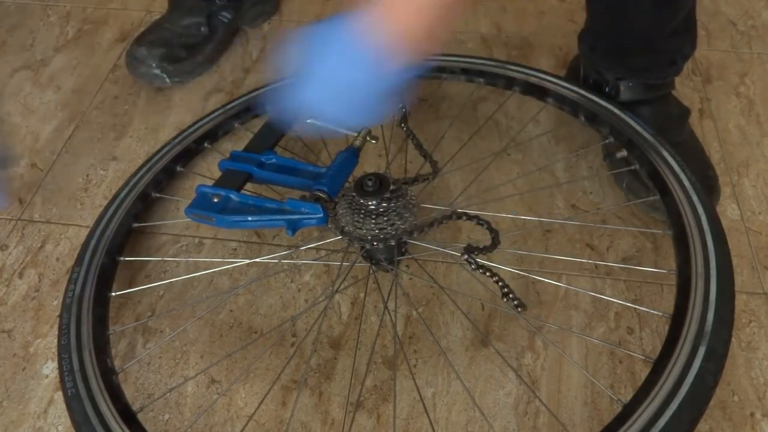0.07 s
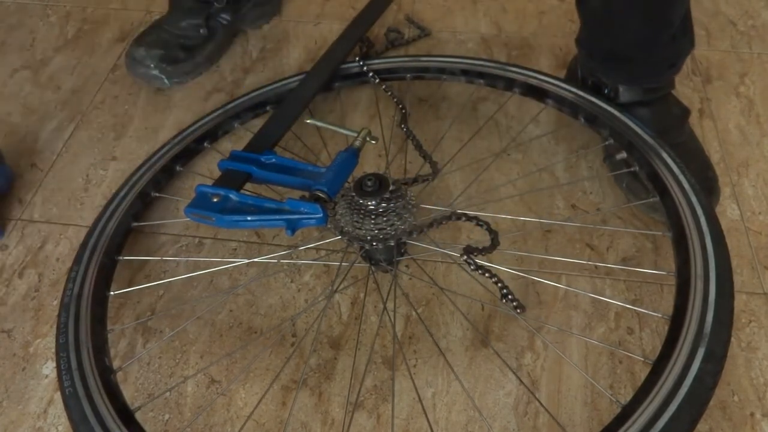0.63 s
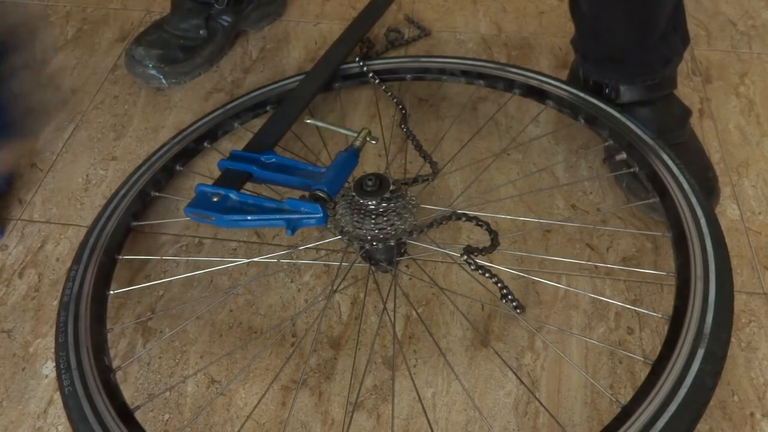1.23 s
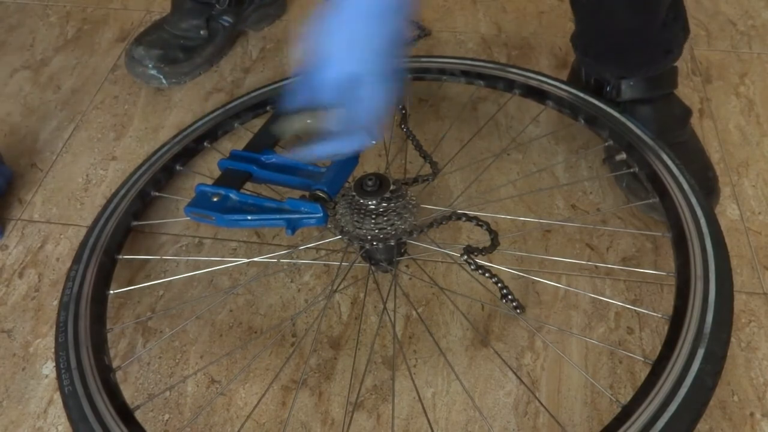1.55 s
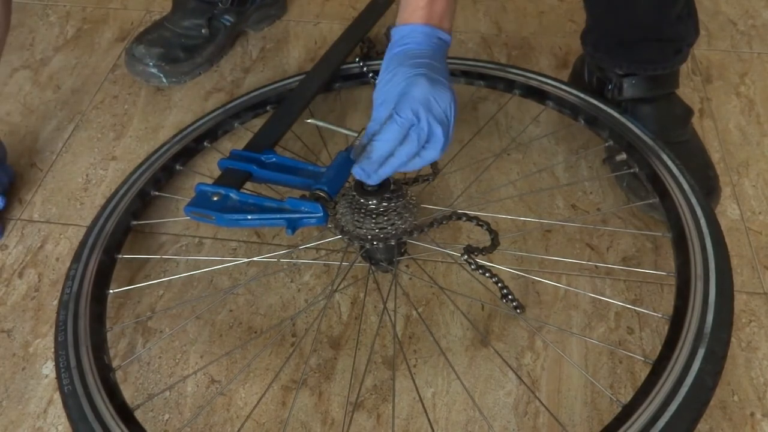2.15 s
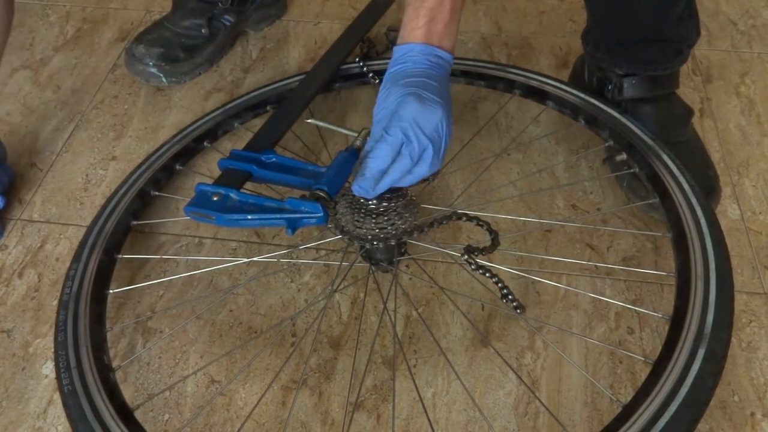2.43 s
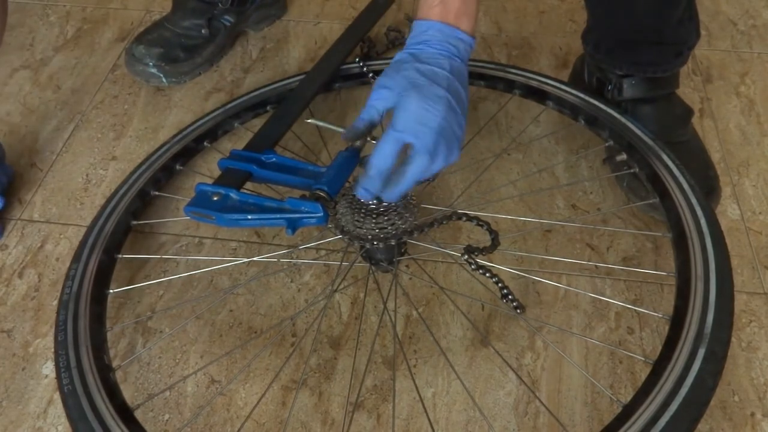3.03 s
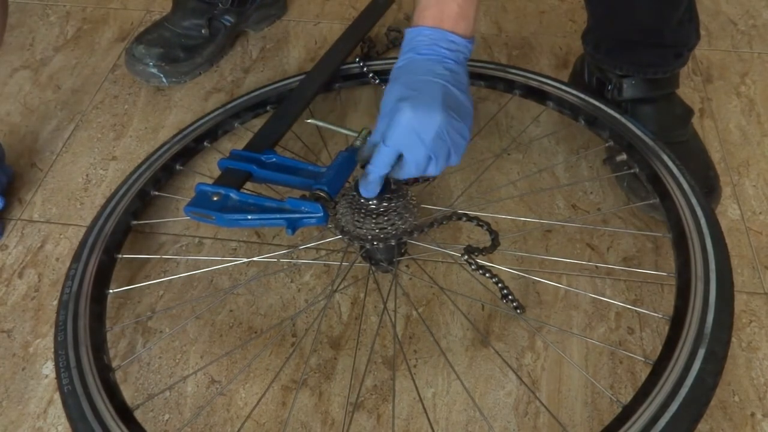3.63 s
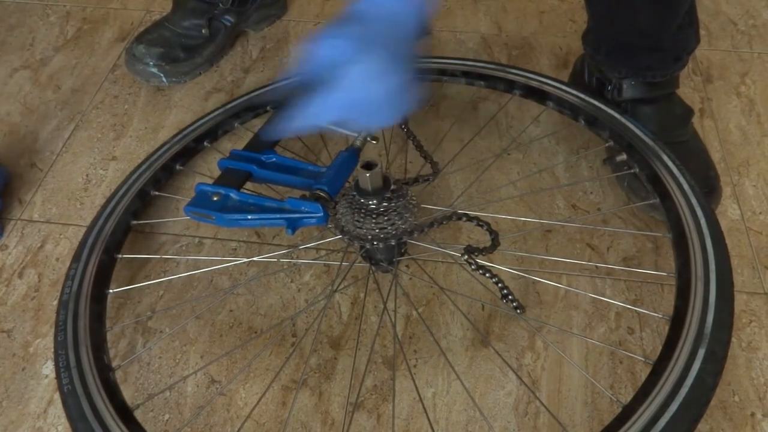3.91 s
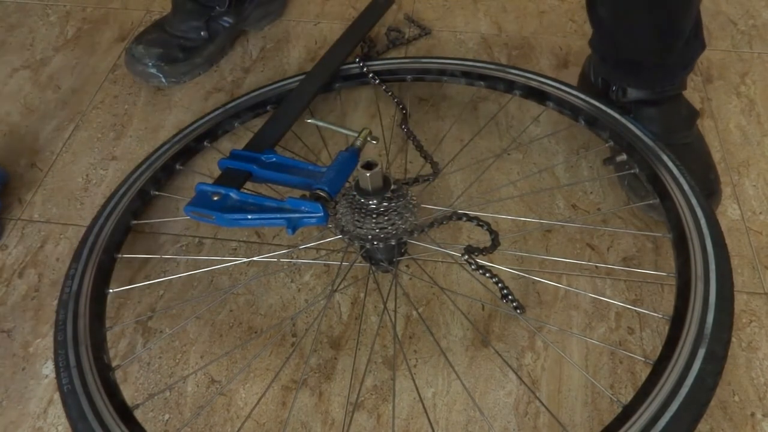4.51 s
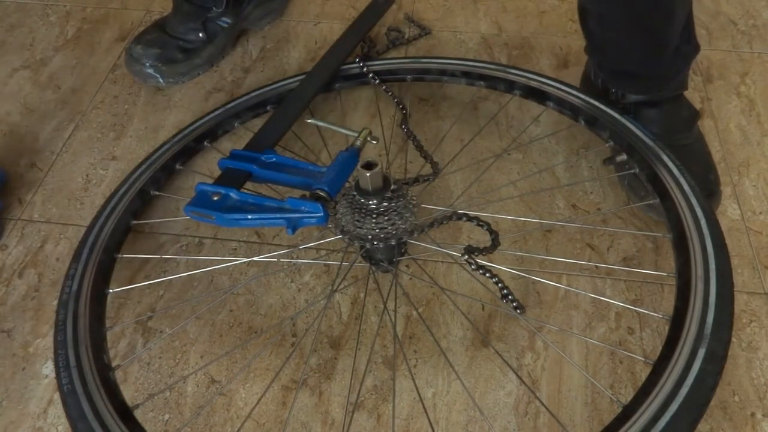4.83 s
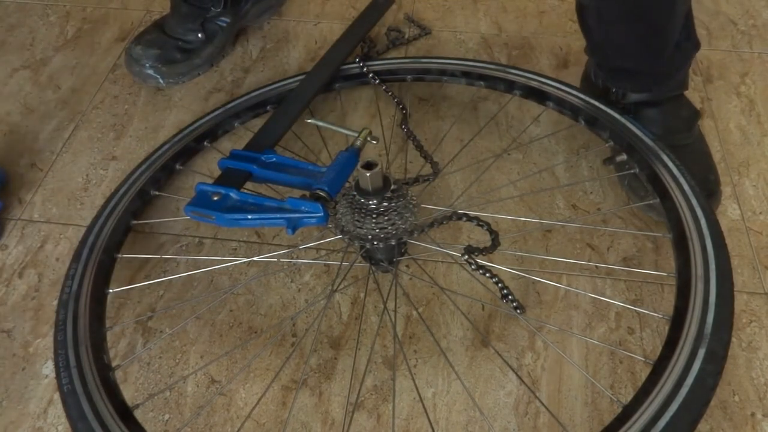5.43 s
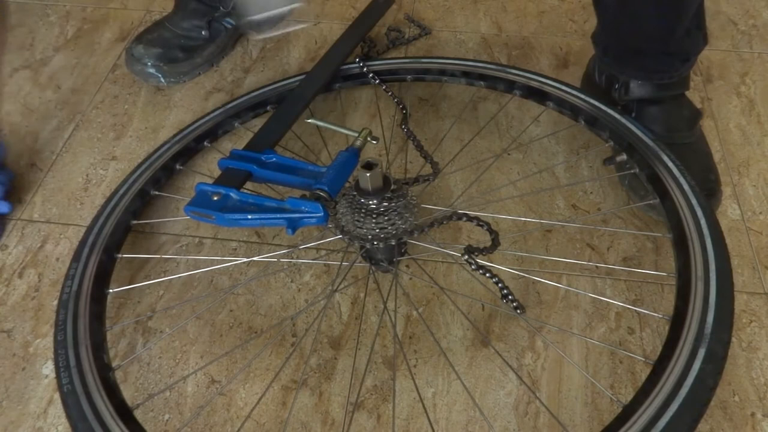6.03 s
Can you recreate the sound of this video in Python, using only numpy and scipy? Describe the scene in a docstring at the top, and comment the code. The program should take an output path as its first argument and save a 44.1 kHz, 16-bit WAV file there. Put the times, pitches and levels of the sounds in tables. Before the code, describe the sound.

Soft glove rubbing, small chain jingles and a light footstep on floorboards sit over steady indoor hiss. Two groups of sharp, ringing knocks follow in the centre, about a second apart, as a steel socket is fitted to a bicycle hub. Then a tool drawer a little to the left rattles along its runners twice, ending with high clinks of a spanner on another tool, all heard from nearby in a small workshop.

```python
"""Chain links jingle faintly and gloves rustle over workshop air; a shoe scuffs and lands on the boards.
A steel socket drops into the sprocket cluster of a bicycle wheel lying on the floor, scrapes, and seats
with hard knocks that set hub and spokes ringing. Then, a little to the left, a drawer of loose metal
rattles along its runners twice, and a spanner clinks against another tool so that both ring.
Knocks are noise bursts and decaying modes; rubbing and rattling are streams of tiny contacts."""
import sys
import numpy as np
from scipy import signal
from scipy.fft import rfft, irfft
from scipy.io import wavfile

SR = 44100
rng = np.random.default_rng(int(sys.argv[2]) if len(sys.argv) > 2 else 0)


def unload_audio(sound):
    """Save the sound as a 16-bit wav file, at the path given as the first command line argument."""
    columns = np.transpose(np.atleast_2d(sound))
    # keep every value between -1 and 1, then stretch to whole-number steps
    steps = np.round(np.clip(columns, -1, 1) * 32767)
    wavfile.write(sys.argv[1], SR, steps.astype(np.int16))


N = 276062
TIME = np.arange(N) / SR

# room tone: f/Hz, level/dB
AIR_COLOUR = [(25, -28), (60, -20.5), (100, -17), (150, -17.5), (280, -13.5), (450, -6.5), (1000, -4.5),
              (1800, -4), (2500, -10.5), (3200, -6), (5000, -10), (10000, -11.5), (16000, -20.5)]
# faint wavering whine in the air: f/Hz, bandwidth/Hz, level/dB
WHINE_BANDS = [(1204, 85, -71), (1476, 140, -69)]
# nudges of the chain: t/s, level/dB, centre f/Hz
JINGLES = [(.085, -51, 3300), (0.107, -52.5, 2870), (.14, -52.5, 3160), (1.494, -58.5, 3770),
           (1.55, -58.5, 4350), (1.898, -51, 3710), (5.438, -60, 4860)]
# strokes of glove and steel over sprockets and tools: peak t/s, level/dB, swell time/s
STROKES = [(.115, -53.5, 0.053), (.32, -57.5, 0.019), (.45, -61.5, 0.082), (1.68, -59.5, 0.18),
           (1.85, -54, 0.012), (1.926, -46.5, 0.012), (2.052, -53, 0.01), (2.54, -60.5, 0.038),
           (2.83, -48, 0.0075), (2.847, -44, 0.0063), (3.02, -61, 0.014), (3.16, -59, 0.04),
           (3.381, -41, 0.004), (3.575, -55, 0.012), (3.8, -59.5, 0.056), (5.72, -62.5, 0.25),
           (5.906, -44, 0.0042), (5.96, -58, .03)]
# tone of the rubbing: f/Hz, level/dB
RUB_COLOUR = [(100, -25), (500, -16.5), (1900, -12), (3000, -4), (4200, -2), (7000, -2.5), (13000, -3),
              (16000, -13.5)]
# shoe scuffs and soft bumps: peak t/s, level/dB, centre f/Hz, swell time/s, treble gain/dB
SCUFFS = [(0.154, -69.5, 230, 0.013, -20), (0.313, -58.5, 398, 0.011, -16), (0.679, -57, 480, 0.013, -16.5),
          (0.95, -50, 960, 0.014, -40), (0.978, -48, 805, 0.019, -14.5), (3.966, -70.5, 332, 0.012, -28),
          (4.075, -55.5, 600, 0.0071, -25), (5.975, -52.5, 342, 0.0053, -35)]
# heel and sole landing: t/s, level/dB
FOOTFALLS = [(.966, -43), (.974, -44.5)]
# woody tone of the floorboards: f/Hz, level/dB
BOARD_COLOUR = [(200, -35), (480, -9), (680, -1.5), (1050, -8), (1900, -12), (2700, -5), (5000, -15),
                (12000, -35)]
# ticks of loose metal: t/s, level/dB, centre f/Hz, t60/s, gain of the loose tool's ring
TICKS = [(.297, -50.5, 2560, 0.18, 0.053), (0.676, -41.5, 5360, 0.016, 0.13),
         (1.495, -53.5, 4050, 0.041, 0), (2.054, -47, 6200, 0.043, 0.2), (3.099, -45, 5300, 0.052, 0.049),
         (4.6375, -36.5, 3260, 0.019, .55), (4.6431, -42.5, 2940, 0.14, 0.12),
         (4.672, -43.5, 3500, 0.046, .4), (4.7313, -44.5, 2010, 0.067, 0.25),
         (4.753, -40, 2630, 0.039, 0.26), (4.762, -40.5, 2600, 0.052, 0.35),
         (4.819, -44.5, 2980, .03, 0.087), (4.831, -43, 2900, .04, 0.13), (4.8696, -33, 2380, 0.032, 0.14),
         (4.906, -37, 2800, .03, .2), (4.917, -35, 2800, 0.028, 0.15), (4.9657, -33, 3770, 0.032, .2),
         (5.0086, -25.5, 8700, 0.016, 0.16), (5.02, -32.5, 8150, 0.027, 0.011),
         (5.059, -38.5, 2300, 0.064, 0.34), (5.072, -33.5, 2470, 0.038, 0.41),
         (5.141, -44, 3000, 0.017, .2), (5.187, -40.5, 2000, 0.16, 0.067)]
# ring of a loose tool in the drawer: f/Hz, level/dB, t60/s
LOOSE_TOOL_MODES = [(2205, -9, .08), (2360, -1.5, 0.085), (3117, -15, 0.057), (3700, -2.5, 0.079)]
# socket hitting the hub: t/s, crack level/dB, ring level/dB, hardness as cut-off f/Hz, seating (0-1)
KNOCKS = [(2.339, -27.5, -42.5, 15000, 0.04), (2.3432, -28, -47.5, 14000, 0),
          (2.355, -33, -42.5, 8000, 0.3), (2.370, -41, -44, 5000, 0), (2.405, -27, -39, 9200, 0.05),
          (3.372, -43, -47.5, 6000, 0.95), (3.3885, -26, -37.5, 5550, 1), (3.391, -28, -42.5, 5500, 0.65)]
# tone of a knock's attack: f/Hz, level/dB
KNOCK_CRACK_COLOUR = [(150, -6), (400, -17), (800, -13.5), (1200, -4), (4000, 2), (6500, -7), (9000, -12.5),
                      (12000, -6.5), (16000, -15)]
# tone of the wheel's dense ring: f/Hz, level/dB
WHEEL_COLOUR = [(100, -46), (190, -9), (290, -6), (430, 1.5), (600, -1.5), (900, -3), (1400, 1),
                (2800, 1.5), (5000, 1.5), (7000, -11.5), (12000, -4), (16000, -24)]
# length of that ring: f/Hz, t60/s
WHEEL_DECAY = [(200, 0.35), (900, 0.67), (2500, 0.45), (5000, 0.44), (12000, 0.17)]
# hub, spokes, sprockets and last the socket's own thin ring: f/Hz, loose level/dB, seated level/dB, t60/s
WHEEL_MODES = [(389.5, -7, -5.5, 0.15), (432, -4, -13, .25), (552, -12, -10, 0.3), (611, -11, -18, .4),
               (692, -14, -14, 0.54), (788, -18, -21, 1.0), (818, -13, -21, 1.0), (884, -11, -18.5, 1.3),
               (938, -21.5, -13, 1), (970, -24, -12, 0.84), (1003, -27, -8, 0.85), (1123, -6.5, -16, 0.45),
               (1340, -3, 5, 0.12), (1617, -17, -2, 0.23), (1821, -5, -8, 0.34), (2420, -7, -19, 0.3),
               (2530, -9, 3, 0.29), (2570, -4.5, -5, 0.22), (3020, -12, 1, 0.21), (3120, -5, -10, 0.23),
               (3362, -3.5, -21, .3), (4060, -6, -9, 0.29), (5300, -11, -0.5, .2), (15120, 10, -15, 0.09)]
# pushes on the drawer: t/s, rise/s, hold/s, rattle level/dB, treble gain/dB, rumble level/dB
PUSHES = [(4.62, 0.14, .01, -45, -5, -83), (4.82, 0.099, 0.21, -41, 0.5, -62),
          (5.93, 0.28, .1, -40, 5.5, -55)]
# tone of the drawer's rattle: f/Hz, level/dB
DRAWER_COLOUR = [(100, -42), (240, -44), (380, -15), (700, -3.5), (1500, 2), (2500, 2), (4000, -1),
                 (6000, -5), (10000, -8.5), (14000, -15.5), (16000, -32)]
# tool on tool: t/s, spanner level/dB, other tool level/dB, most excited f/Hz, crack level/dB, t60 factor
CLINKS = [(5.930, -39, -65, 3520, -62, 0.88), (5.99, -36, -58, 5500, -42, .5),
          (5.992, -26, -48, 4900, -31, 0.36), (6.0358, -28.5, -21, 6400, -19.5, 1.4),
          (6.048, -27.5, -28.5, 7000, -22.5, 1.28)]
# ring of the spanner: f/Hz, level/dB, t60/s
SPANNER_MODES = [(1630, -3.5, 0.59), (3070, -8, .09), (4610, -7.5, 0.18), (5050, -4.5, 0.08),
                 (5060, -17, 0.1), (6345, -21, 0.074), (6763, 1.5, 0.093), (8600, -3, 0.058),
                 (11200, -7, .04)]
# ring of the tool it strikes: f/Hz, level/dB, t60/s
OTHER_TOOL_MODES = [(5065, -3.5, 0.22), (6846, -1.5, 0.14), (6895, -3, .07), (7070, -23, .025),
                    (7440, -24, .03), (7630, -23, .07), (8200, 0, 0.063), (8200, -13, .05),
                    (13800, 3, 0.031)]
# tone of a clink's attack: f/Hz, level/dB
CLINK_CRACK_COLOUR = [(300, -41), (2000, -40), (3800, -11), (5000, 18), (5900, 6), (7200, 16), (9600, -1),
                      (11000, 4), (16000, -14)]
# stereo width of diffuse sound: f/Hz, side level/dB relative to mid
WIDTH = [(60, -7.5), (250, -0.5), (600, 3), (1400, 2), (2800, -2.5), (5000, -5), (14000, -25.5)]
# length of the room's tail: f/Hz, t60/s
ROOM_DECAY = [(150, 1.15), (1000, 0.31), (5000, 0.23), (14000, 0.67)]
# tone of that tail: f/Hz, level/dB
ROOM_COLOUR = [(100, 2.5), (1000, -2), (4000, 3.5), (8000, -1.5), (16000, -3)]


def amp(db):
    """Decibels to gain."""
    return 10 ** (np.asarray(db) / 20)


def unit(x):
    """Scale to rms 1."""
    return x / np.sqrt(np.mean(x ** 2) + 1e-20)


def at_hz(points, hz):
    """Read a table on a log-frequency axis."""
    f, value = np.transpose(points)
    return np.interp(np.log(np.maximum(hz, 1)), np.log(f), value)


def add(track, s, sound):
    """Mix a sound in at s seconds."""
    start = round(s * SR)
    track[start:start + len(sound)] += sound[:N - start]


def filtered(x, kind, hz, order=2):
    """Butterworth low-, high- or band-pass."""
    return signal.sosfilt(signal.butter(order, hz, kind, fs=SR, output="sos"), x)


def coloured(x, spectrum, keep_power=True, size=2048):
    """Minimum-phase EQ with the given curve."""
    gain = amp(at_hz(spectrum, np.fft.rfftfreq(size, 1 / SR)))
    cepstrum = irfft(np.log(unit(gain) if keep_power else gain))
    cepstrum[1:size // 2] *= 2
    cepstrum[size // 2 + 1:] = 0
    return signal.oaconvolve(x, irfft(np.exp(rfft(cepstrum))))[:len(x)]


def hump(hz, below_db, above_db):
    """A broad EQ peak, with the given gains three octaves below and above its top."""
    return [(hz / 8, below_db), (hz, 0), (hz * 8, above_db)]


def swell(t, length):
    """A rounded rise and fall around t = 0."""
    return np.exp(1 - np.minimum(np.hypot(1, t / length), 30))


def fade(t60):
    """One second of exponential decay."""
    return np.exp(-np.minimum(np.log(1000) * TIME[:SR] / t60, 30))


def burst(t60):
    """Dying noise: many close, heavily damped modes."""
    return rng.standard_normal(SR) * fade(t60)


def mode(hz, t60):
    """A struck resonance."""
    return np.sin(2 * np.pi * hz * TIME[:SR]) * fade(t60)


def dense_ring(decays, count=7):
    """One second of noise in which each band dies at its own rate."""
    centres = np.geomspace(200, 14000, count)
    place = np.interp(np.fft.rfftfreq(SR, 1 / SR), centres, np.arange(count))
    shares = np.maximum(1 - abs(place - np.arange(count)[:, None]), 0)
    bands = irfft(rfft(rng.standard_normal(SR)) * shares, SR)
    return sum(band * fade(t60) for band, t60 in zip(bands, at_hz(decays, centres)))


def grains(per_s, spread_db, size=N):
    """Random tiny contacts of uneven size; rms 1."""
    at = np.flatnonzero(rng.random(size) < per_s / SR)
    force, sign = rng.random((2, size))[:, at]
    out = np.zeros(size)
    out[at] = amp(-spread_db * np.log(force + .02)) * np.sign(sign - .5)
    return unit(out)


def diffuse(mid, side):
    """Two unrelated signals as sound from all round: wide in the mids, narrow in the treble."""
    return mid + coloured(side, WIDTH, keep_power=False) * np.array([[1], [-1]])


def panned(x, left_db):
    """Pan so that the left channel leads the right by left_db."""
    return x * amp(np.array([[left_db], [-left_db]]) / 2)


def air(hiss_db=-62.5):
    """A bed of steady hiss with two narrow bands whining through it."""
    white = rng.standard_normal(N)
    whine = sum(amp(db) * unit(signal.lfilter(*signal.iirpeak(hz, hz / width, fs=SR), white))
                for hz, width, db in WHINE_BANDS)
    return whine + amp(hiss_db) * coloured(rng.standard_normal(N), AIR_COLOUR)


def chain(spread_s=.04, detune=0.16, links=14):
    """A nudge makes links touch in quick succession, each with a pitch of its own."""
    out = np.zeros(N)
    for s, db, hz in JINGLES:
        for delay, step in zip(rng.random(links), rng.standard_normal(links)):
            add(out, s + spread_s * delay, amp(db) * mode(hz * np.exp(detune * step), t60=0.023))
    return out


def gloves():
    """Rubbing is a stream of tiny slips that swells and fades with each stroke."""
    effort = sum(amp(db) * swell(TIME - s, length) for s, db, length in STROKES)
    return effort * coloured(grains(per_s=11000, spread_db=5), RUB_COLOUR)


def shoes(lead_s=.12):
    """A sole drags dull grit over the boards and lands with a wooden knock."""
    out = np.zeros(N)
    t = TIME[:SR // 2] - lead_s
    for s, db, hz, length, treble_db in SCUFFS:
        grit = grains(per_s=2500, spread_db=4, size=len(t))
        drag = coloured(grit, hump(hz, below_db=-41, above_db=treble_db))
        add(out, s - lead_s, amp(db) * swell(t, length) * filtered(drag, "high", hz * 0.47))
    for s, db in FOOTFALLS:
        add(out, s, amp(db) * coloured(burst(t60=.05), BOARD_COLOUR))
    return filtered(out, "low", hz=5500)


def ticks(mode_spread_db=1):
    """Small steel parts touch and are quickly damped; most also set a loose tool ringing."""
    out = np.zeros(N)
    for s, db, centre_hz, click_t60, ring_gain in TICKS:
        click = coloured(burst(click_t60), hump(centre_hz, below_db=-18.5, above_db=-26))
        ring = sum(amp(mode_db + mode_spread_db * rng.standard_normal()) * mode(hz, t60)
                   for hz, mode_db, t60 in LOOSE_TOOL_MODES)
        add(out, s, amp(db) * (click + ring_gain * ring))
    return out


def socket_knocks(mode_spread_db=3, dense_db=-2, modes_db=-5):
    """A crack, the wheel's dense ring and its strongest modes, whose balance shifts as the socket seats."""
    mid, side = np.zeros((2, N))
    modes = np.array([(-1) ** k * mode(hz, t60) for k, (hz, _, _, t60) in enumerate(WHEEL_MODES)])
    _, loose_db, seated_db, _ = np.transpose(WHEEL_MODES)
    side_ring = coloured(dense_ring(WHEEL_DECAY), WHEEL_COLOUR)
    for s, crack_db, ring_db, contact_hz, seated in KNOCKS:
        crack = amp(crack_db) * coloured(burst(t60=0.029), KNOCK_CRACK_COLOUR)
        dense = amp(ring_db + dense_db) * coloured(dense_ring(WHEEL_DECAY), WHEEL_COLOUR)
        balance_db = loose_db + seated * (seated_db - loose_db)
        scatter_db = mode_spread_db * rng.standard_normal(len(modes))
        rings = amp(ring_db + modes_db + balance_db + scatter_db) @ modes
        add(mid, s, filtered(crack + dense + rings, "low", contact_hz, order=1))  # softer hits are duller
        add(side, s, amp(ring_db + dense_db) * side_ring)
    return diffuse(mid, side)


def socket_scrape(start_s=2.821, length_s=0.035, edge_s=.004, level_db=-47.5, tail_db=-5):
    """Steel slides over the sprockets' rim: fine, even slips excite one band, which rings on briefly."""
    slips = unit(filtered(rng.standard_normal(N), "band", hz=(3740, 5400)))
    contact = np.clip(np.minimum(TIME - start_s, start_s + length_s - TIME) / edge_s, 0, 1)
    rasp = amp(level_db) * contact * slips
    tail = burst(t60=0.3)
    return rasp + amp(tail_db) * signal.fftconvolve(rasp, tail / np.linalg.norm(tail))[:N]


def drawer(piece_db=-4, runner_db=-4, piece_count=6, coast_db_per_s=109, rumble_exponent=0.89):
    """Runners grind, the box rumbles and loose pieces jiggle; each push builds, holds, then coasts out."""
    grit = grains(per_s=6000, spread_db=1)
    pieces = np.zeros(N)
    for _ in range(piece_count):
        hits = grains(per_s=55, spread_db=0.5)
        pieces += signal.oaconvolve(hits, burst(t60=0.041)[:SR // 20])[:N]
    rattle = coloured(amp(piece_db) * unit(pieces) + amp(runner_db) * grit, DRAWER_COLOUR)
    treble = filtered(rattle, "high", hz=4970, order=1)
    box = unit(filtered(grit, "band", hz=(305, 490)))
    out = np.zeros(N)
    for start, rise_s, hold_s, db, treble_db, rumble_db in PUSHES:
        t = TIME - start
        coast = amp(-coast_db_per_s * np.maximum(t - rise_s - hold_s, 0))
        speed = np.clip(t / rise_s, 0, 1) * coast
        out += amp(db) * speed * (rattle + (amp(treble_db) - 1) * treble)
        out += amp(rumble_db) * speed ** rumble_exponent * box
    return out


def spanner(falloff_db_per_octave=10):
    """Both tools ring and their close modes beat; the point of contact decides which ring most."""
    rings, cracks = np.zeros((2, N))
    for s, spanner_db, other_db, centre_hz, crack_db, t60_factor in CLINKS:
        add(cracks, s, amp(crack_db) * burst(t60=0.027))
        rings[round(s * SR):] = 0  # a new contact chokes the previous ring
        for db, modes in (spanner_db, SPANNER_MODES), (other_db, OTHER_TOOL_MODES):
            for hz, mode_db, t60 in modes:
                falloff_db = falloff_db_per_octave * abs(np.log2(hz / centre_hz))
                add(rings, s, amp(db + mode_db - falloff_db) * mode(hz, t60 * t60_factor))
    return filtered(rings + coloured(cracks, CLINK_CRACK_COLOUR), "high", hz=1510)


def workshop_reverb(send, predelay_s=.003, build_s=0.019):
    """The room's reflections build up into a diffuse tail."""
    build_up = np.clip((TIME[:SR] - predelay_s) / build_s, 0, 1)
    tails = [coloured(dense_ring(ROOM_DECAY) * build_up, ROOM_COLOUR) for _ in range(2)]
    mid, side = [signal.fftconvolve(send, tail / np.linalg.norm(tail))[:N] for tail in tails]
    return diffuse(mid, side)


def scene():
    """Work at the wheel in the middle, the tools a little to the left, room air all round."""
    hands = gloves() + chain() + socket_scrape()
    rattle = drawer() + ticks()
    clinks = spanner()
    steps = shoes()
    middle = socket_knocks() + hands
    left = panned(rattle + clinks, left_db=2.5)
    send = amp(-9.5) * hands + amp(-8) * rattle + amp(-12) * clinks + amp(-2) * steps
    room = panned(workshop_reverb(send), left_db=-0.5)
    # a low cut thins the bass of the knocks, rubbing and rattles
    work = filtered(middle + left + room, "high", hz=289, order=4)
    return work + steps + diffuse(air(), air())


def record(dry):
    """A steep high cut takes off the very top."""
    cutoff_hz = 16100
    return signal.sosfilt(signal.ellip(10, .1, 70, cutoff_hz, fs=SR, output="sos"), dry)


dry = scene()
out = record(dry)
unload_audio(out)
```